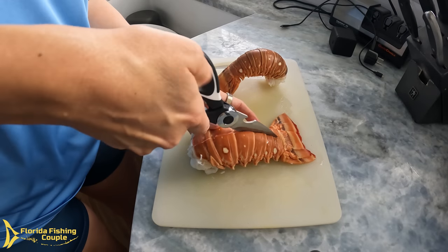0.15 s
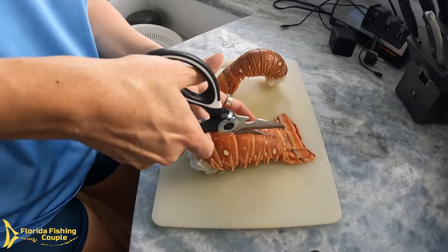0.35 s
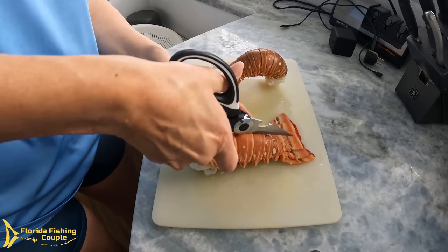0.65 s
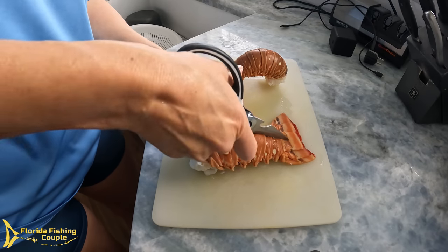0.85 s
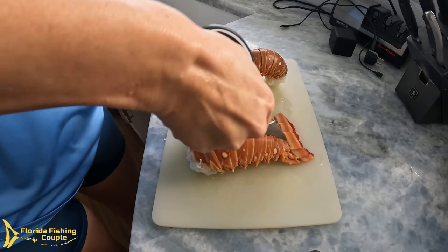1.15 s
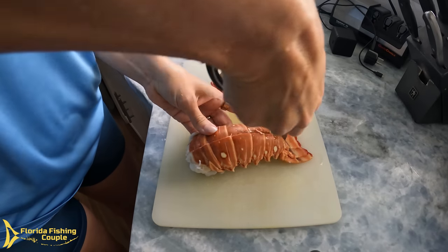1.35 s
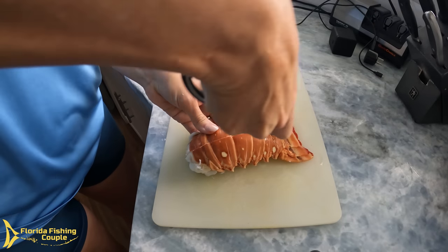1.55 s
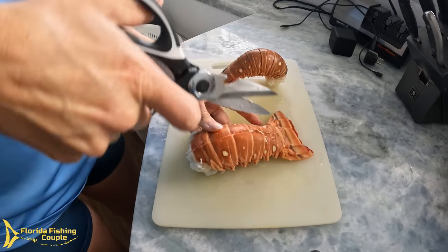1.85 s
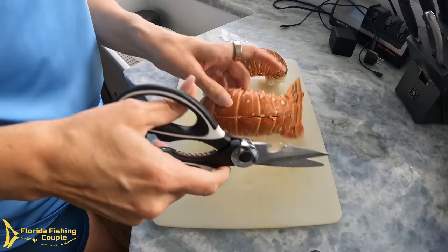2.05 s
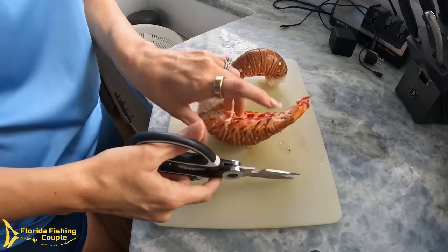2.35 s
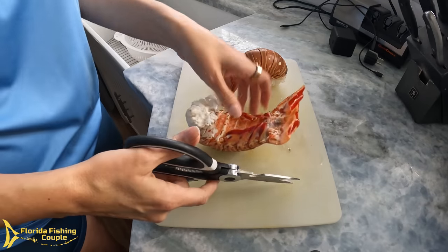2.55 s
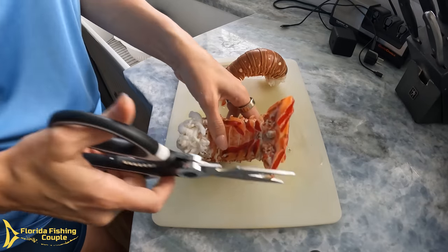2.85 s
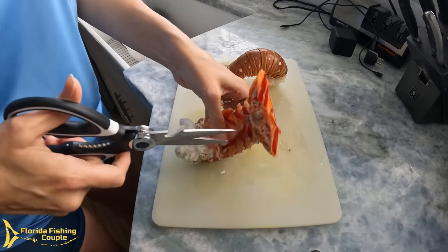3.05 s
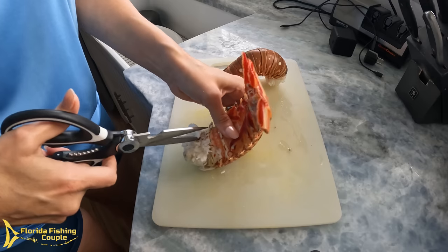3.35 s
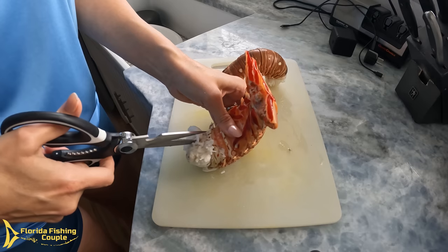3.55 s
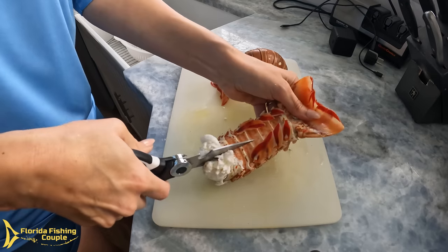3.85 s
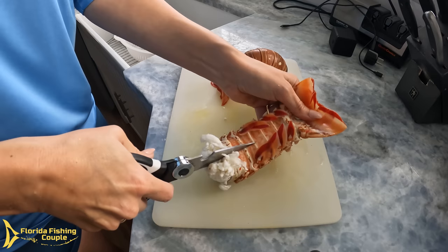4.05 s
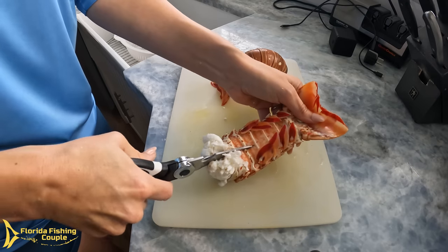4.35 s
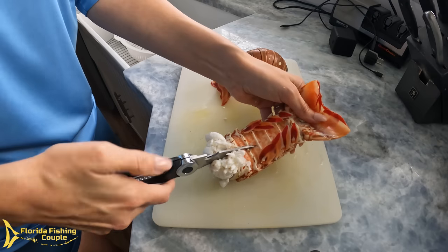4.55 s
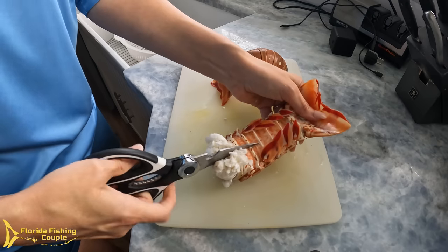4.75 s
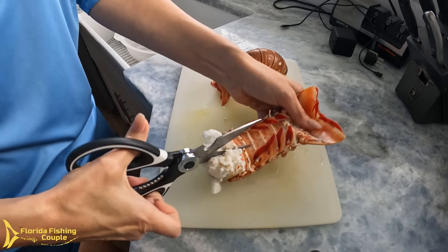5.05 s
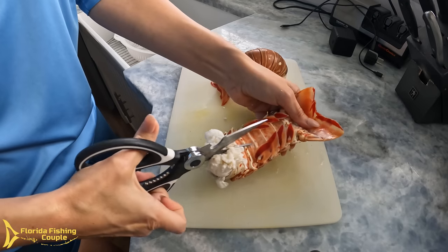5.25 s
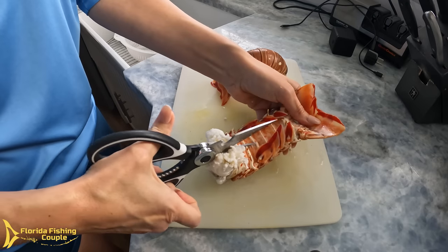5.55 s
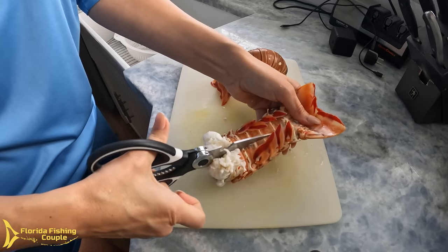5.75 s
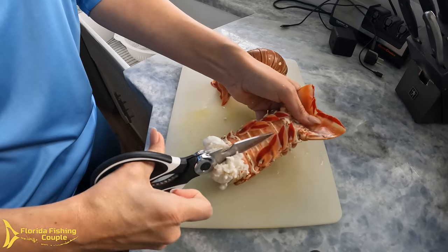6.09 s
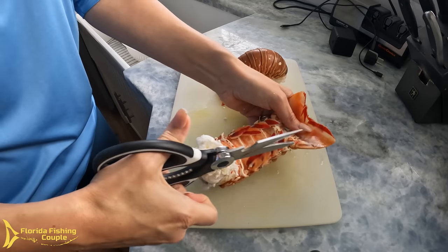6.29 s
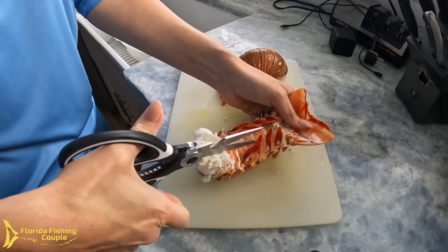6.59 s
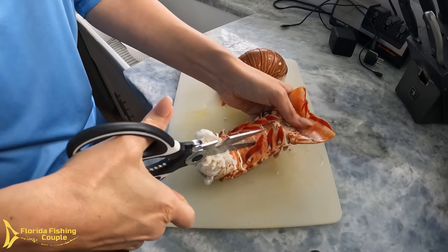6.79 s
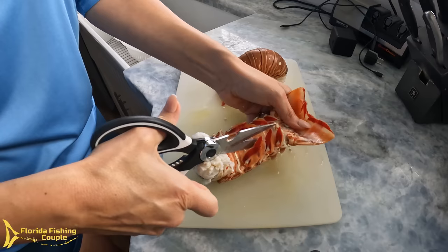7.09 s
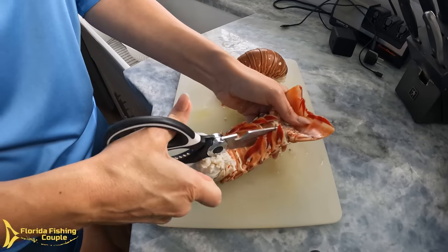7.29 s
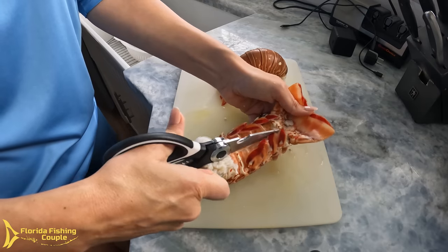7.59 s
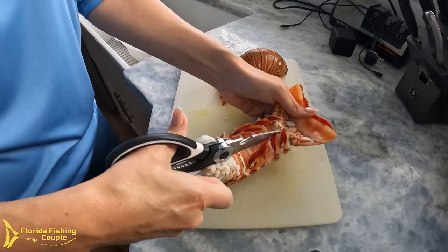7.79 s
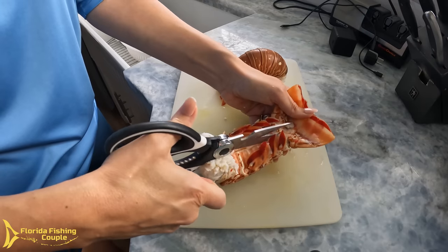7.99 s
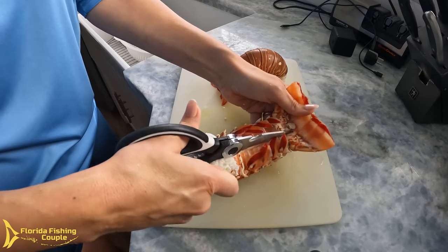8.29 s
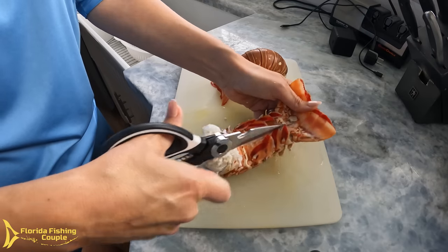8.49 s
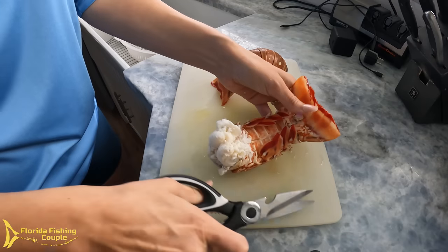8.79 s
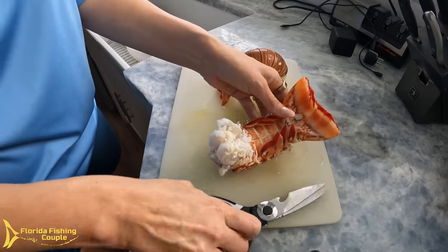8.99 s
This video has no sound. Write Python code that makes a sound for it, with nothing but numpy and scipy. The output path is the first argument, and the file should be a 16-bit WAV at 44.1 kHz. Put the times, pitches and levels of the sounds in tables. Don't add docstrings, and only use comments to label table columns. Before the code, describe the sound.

Sharp shell cracks and dry crunches come in uneven bursts on a cutting board in a bright hard-walled kitchen, low hum and faint distant engine behind.

```python
import sys
import numpy as np
from scipy import signal
from scipy.io import wavfile
from scipy.ndimage import uniform_filter1d

SR = 44100
rng = np.random.default_rng(int(sys.argv[2]) if len(sys.argv) > 2 else 0)


def bounce(signal):
    frames = np.transpose(np.atleast_2d(signal))
    limited = np.clip(frames, -1, 1)
    pcm = np.round(limited * 32767).astype(np.int16)
    wavfile.write(sys.argv[1], SR, pcm)


def invert_db(x):
    u = np.asarray(x, float) / 20
    return 10 ** u


N = 402633

RUB_WIDTH = 0.2


def cracks():
    # (frequency [Hz], level [dB], t60 [s])
    board_modes = [(256, -21.5, 0.0047), (416, 2.5, 0.033), (531, -12.5, 0.15), (693, 10.5, 0.054),
                   (800, 5.5, 0.041), (1162, 5, 0.046), (1804, -1, 0.074)]
    dry, feed, t = np.zeros(N), np.zeros(N), np.arange(3000) / SR
    rows = breaks()
    chance = rng.standard_normal((len(rows), 3, len(t)))
    snap = 1. * (t == 0)
    sharp = peak_one(resonate(snap, 3500, 8500))
    for (s, db, hz, knock_db, t60, wet_db), (grain, uneven, shift) in zip(rows, chance):
        shell = peak_one(resonate(resonate(snap, hz, 0.31 * hz), hz, 1.5 * hz))
        spray = grain * invert_db(2.62 * uneven - 60 * t / max(t60, .002))
        spray = spray * np.minimum(t / 0.00078, 1) * 39.7 * t60
        ring = signal.fftconvolve(snap + spray, shell)[:len(t)]
        fizz = signal.fftconvolve(snap + 5.9 * spray, sharp)[:len(t)]
        board = np.zeros(len(t))
        for k, (f, level_db, mode_t60) in enumerate(board_modes):
            reach = invert_db(level_db - 60 * t / mode_t60) / (1 + (f / (1.28 * hz)) ** 4)
            board += reach * np.sin(2 * np.pi * f * (1 + 0.023 * shift[k]) * t)
        knock = signal.fftconvolve(snap + 0.32 * spray, board)[:len(t)]
        fizz_share = np.clip(t60 / 0.008, 0.49, 1) * invert_db(0.16 * db) / (1 + (1600 / hz) ** 2)
        broken = peak_one(peak_one(ring) + fizz_share * peak_one(fizz))
        add(dry, s, invert_db(db) * (broken + invert_db(knock_db) * peak_one(knock)))
        add(feed, s, invert_db(db + wet_db) * 0.69 * shell)
        add(feed, s, invert_db(db + wet_db) * 1.37 * sharp)
        add(feed, s, invert_db(db + wet_db + knock_db) * 0.78 * peak_one(board))
    return dry, feed


def breaks():
    # (time [s], peak [dB], shell pitch [Hz], room share [dB])
    snaps = [(1.156, -11, 2500, -12), (1.179, -0.5, 3270, -18), (1.3155, -1.5, 4950, -33),
             (1.3295, 1, 3600, -16.5), (1.3682, 1.5, 3230, -15), (1.4335, -2.5, 3040, -17.5),
             (1.4451, -14, 3250, -24), (5.0812, -7, 2540, -21), (5.903, -6, 3700, -12),
             (5.9222, -15, 3623, -20), (7.3654, -14.5, 2870, -17), (7.3961, -6.5, 3550, -22),
             (7.4217, -12.5, 3500, -22), (7.9334, -7, 3660, -18.5), (8.3548, -5.5, 2240, -14),
             (8.522, -13.5, 3130, -16), (8.53, -19, 1870, -5)]
    # (time [s], peak [dB], shell pitch [Hz], room share [dB])
    splits = [(0.1102, -18, 2850, -8.5), (0.4782, -11, 2940, -14.5), (0.7842, -4, 3670, -11.5),
              (0.978, -14, 5500, -14), (1.2875, -20, 2020, -17), (1.3119, -5, 3560, -1),
              (1.3838, -15.5, 1840, -7), (1.75, -12, 3100, -11), (1.763, -16.5, 2740, -6),
              (2.3301, -25.5, 3640, 3.5), (4.0876, -7.5, 2920, -5), (4.0972, -1, 9280, -5.5),
              (4.3297, 1.5, 4400, -5.5), (5.0756, -5, 2460, -12.5), (5.087, -6, 3600, -6.5),
              (6.0472, 1.5, 4540, -4), (6.1268, -12, 3460, -3), (6.173, -9.5, 3530, -20.5),
              (7.6694, 2, 4300, -6.5), (7.9374, -18.5, 3700, -30), (8.3509, -4.5, 3870, -8),
              (8.8992, -10, 5750, -7.5)]
    # (time [s], peak [dB], shell pitch [Hz], board [dB], room share [dB])
    knocks = [(0.6529, -33, 564, 1, 2), (.772, -12.5, 2000, -9, -5), (.7736, -17.5, 700, -14, -7),
              (0.9213, -33.5, 800, 2.5, -12), (0.9771, -15, 1060, -24, -18), (2.33, -12, 1500, 6, -6.5),
              (2.338, -11.5, 2540, 0, -6), (2.45, -11.5, 1030, 1.5, -19), (2.638, -22, 830, 6.5, -17),
              (4.0976, -7.5, 1980, -4.5, -11.5), (4.106, -9.5, 1910, -5, -7.5),
              (4.3281, -8.5, 5030, -5.5, -25), (5.2438, -21.5, 2800, -6, -2), (6.23, -21.5, 680, 8, -14),
              (6.8673, -21, 1350, -6, -0.5), (7.67, -10.5, 730, -12, -25), (8.8905, -19.5, 540, 5, -19),
              (8.896, -7.5, 2080, -3.5, -6), (9.103, -13, 1090, -1, -10)]
    # (time [s], peak [dB], shell pitch [Hz], board [dB], splinter t60 [s])
    crushes = [(0.473, -22.5, 860, -15, 0.048), (.551, -16, 1940, -27, 0.1), (.7693, -23.5, 760, -7, 0.14),
               (1.7522, -11, 1820, -37, 0.093), (2.64, -21.5, 1380, 3, 0.11),
               (4.1088, -12.5, 979, -4, 0.064), (5.9401, -11.5, 3250, -14.5, 0.029),
               (6.0433, -8, 2720, -18, 0.038), (6.2846, -21, 633, -23, 0.075),
               (7.6622, -15, 2270, -15, 0.052), (8.89, -9.5, 1190, -23, 0.038)]
    # (time [s], peak [dB], shell pitch [Hz])
    back_ticks = [(0.0553, -29, 1960), (0.0752, -30, 2860), (0.0886, -25, 2700), (0.2312, -32, 2750),
                  (0.281, -37.5, 1830), (0.43, -30, 1470), (0.46, -28, 3430), (0.4674, -19, 2010),
                  (0.5416, -33, 4110), (0.6307, -25, 1790), (0.636, -21.5, 2340), (0.6534, -30, 4240),
                  (0.683, -31, 4350), (0.7226, -28.5, 1990), (1.1525, -27.5, 2340), (1.248, -17, 2060),
                  (1.6152, -19, 2170), (1.8204, -21.5, 4460), (1.9092, -33, 2800), (2.049, -42, 3920),
                  (2.164, -39, 3040), (2.9482, -39, 5160), (2.9835, -45, 2640), (3.265, -36, 1100),
                  (3.2974, -35, 820), (3.3178, -37, 820), (3.335, -34, 800)]
    # (time [s], peak [dB], shell pitch [Hz])
    belly_ticks = [(4.0133, -37.5, 4500), (4.078, -37, 3530), (4.2128, -23, 3950), (4.31, -24, 5500),
                   (4.803, -31.5, 4400), (5.173, -21, 2130), (5.3353, -21.5, 2900), (5.3423, -24, 940),
                   (5.3719, -21, 2750), (5.8653, -32.5, 3160), (5.885, -32, 3780), (5.914, -15.5, 3140),
                   (6.004, -29, 2370), (6.123, -15, 2600), (6.2823, -20.5, 4480), (6.985, -35, 2500),
                   (7.0386, -23.5, 1330), (7.4809, -20, 3860), (7.511, -25, 3800), (7.568, -29.5, 2980),
                   (7.5862, -29, 2980), (7.5986, -25, 3250), (7.623, -22, 5600), (7.6453, -15.5, 3880),
                   (7.658, -24, 3490)]
    # (time [s], peak [dB], shell pitch [Hz])
    fan_ticks = [(7.909, -30, 5620), (7.9236, -28, 4020), (7.9277, -25, 2220), (8.1707, -22, 2650),
                 (8.343, -22, 3530), (8.5457, -22, 3190), (8.5528, -23, 2670), (8.56, -33, 2110),
                 (8.5871, -21, 1960), (8.624, -35, 2840), (8.631, -25, 2630), (8.808, -45, 4040),
                 (8.8256, -32, 5600), (8.839, -34.5, 2860), (8.998, -23, 3000), (9.122, -25, 3870)]
    # (time [s], peak [dB], shell pitch [Hz])
    crisp_ticks = [(.242, -35, 4500), (0.274, -39, 3000), (.321, -30, 2500), (.738, -30, 4500),
                   (0.9783, -19, 2200), (1.124, -34, 5500), (1.264, -27, 4200), (1.338, -21, 800),
                   (1.678, -33, 3000), (1.72, -26, 5000), (2.4498, -29.5, 2980), (2.876, -43, 6000),
                   (2.916, -39, 6500), (2.931, -43, 6500), (3.021, -44, 4400), (3.382, -51, 4200),
                   (3.501, -52, 6000), (4.782, -38, 2500), (4.918, -37, 2800), (5.008, -35, 2000),
                   (5.963, -20.5, 2500), (6.957, -29.5, 6000), (7.347, -29, 4000), (7.604, -25, 6000),
                   (7.616, -34, 5500), (7.634, -30, 4500), (8.329, -28, 3500), (8.659, -38, 3500),
                   (8.674, -39, 2000), (8.3555, -12, 6500), (6.8682, -22.5, 4200), (7.6725, -9, 6500),
                   (7.939, -31, 6500), (.7, -39, 1800), (0.75, -28, 900)]
    tick_t60s = [0.0089, 0.0067, 0.0088, .003]
    rows = [(s, db, hz, -46, 0.001, wet) for s, db, hz, wet in snaps]
    rows += [(s, db, hz, -42, 0.011, wet) for s, db, hz, wet in splits]
    rows += [(s, db, hz, board, 0.015, wet) for s, db, hz, board, wet in knocks]
    rows += [(*row, -9) for row in crushes]
    for table, t60 in zip([back_ticks, belly_ticks, fan_ticks, crisp_ticks], tick_t60s):
        rows += [(*row, -12, t60, -6) for row in table]
    return rows


def shears():
    # (frequency [Hz], level [dB], t60 [s])
    shear_modes = [(590, 0, .32), (1140, -5, .22), (1730, -6, .2)]
    # (time [s], peak [dB])
    rattles = [
        (2.452, -22),
        (8.893, -19),
        (.72, -30),
    ]
    # (time [s], peak [dB], frequency [Hz])
    thumps = [
        (2.33, -23, 257),
        (4.108, -23, 230),
        (2.4512, -15.5, 1714),
        (2.4506, -17, 1156),
        (4.108, -17, 534),
        (4.333, -24.5, 170.4),
        (8.893, -25, 218),
    ]
    out, t = np.zeros(N), np.arange(SR // 2) / SR
    for (s, peak_db), noise in zip(rattles, rng.standard_normal((len(rattles), len(t)))):
        rattle = sum(invert_db(db - 60 * t / t60) * resonate(noise, hz, 60) for hz, db, t60 in shear_modes)
        add(out, s, invert_db(peak_db) * peak_one(rattle))
    for s, peak_db, hz in thumps:
        fall_db = 60 * t / 0.08 * np.sqrt(hz / 250)
        add(out, s, invert_db(peak_db - fall_db) * np.sin(2 * np.pi * hz * t))
    return out


def rustle():
    # (shell modes (frequency [Hz], width [Hz], level [dB]),
    #          stroke (time [s], level [dB], slip rate [1/s]))
    creaks = [
        ([(1230, 1100, 1), (2880, 1200, -1.5), (4200, 1299, -1), (5960, 1600, -1)], [(6.878, -33, 354), (6.889, -33.5, 550), (6.902, -30, 440), (6.912, -31.5, 550), (6.925, -33, 620), (6.945, -40, 500)]),
        ([(1910, 1200, -6), (3240, 700, -4.5), (4020, 900, 1), (5560, 1800, -7)], [(7.045, -33, 560), (7.09, -35, 650), (7.125, -27.5, 840), (7.14, -30, 970), (7.175, -27, 1030), (7.195, -29.5, 1400), (7.21, -36, 860), (7.228, -28.5, 730), (7.245, -32, 270)]),
    ]
    # (start [s], length [s], top [dB], pitch [Hz])
    swells = [(1.7, 0.093, -35.5, 2560), (2.075, 0.09, -43.5, 2840), (6.945, 0.058, -49, 3970),
              (7.02, 0.026, -30.5, 4300), (7.065, 0.031, -27.5, 2880), (8.1, 0.28, -53.5, 3530),
              (8.52, 0.069, -37.5, 3640), (9.045, 0.05, -43, 2500)]
    # (start [s], length [s], top [dB], pitch [Hz])
    builds = [
        (.68, 0.13, -52, 750),
        (.68, 0.11, -40.5, 1930),
        (7.55, 0.12, -41, 3600),
        (8.31, 0.068, -28.5, 3700),
    ]
    # (start [s], length [s], top [dB], pitch [Hz])
    afters = [(0, 0.14, -40.5, 3600), (.56, 0.14, -37, 2100), (1.19, 0.093, -37.5, 2480),
              (.98, 0.083, -55, 5600), (5.94, 0.045, -24, 2970), (8.61, 0.078, -37.5, 4030)]
    # (start [s], length [s], top [dB], pitch [Hz])
    blooms = [
        (4.34, 0.34, -38, 4400),
        (2.2, .12, -57, 850),
        (3.83, .09, -65, 6000),
    ]
    # (start [s], length [s], top [dB], first pitch [Hz], last pitch [Hz])
    narrow_bands = [
        (7.2, 0.036, -36, 1670, 1800),
        (4.34, 0.24, -39.5, 4450, 4440),
    ]
    out = np.zeros(N)
    add(out, *slips())
    for modes, rows in creaks:
        add(out, *creak(modes, rows))
    for table, top, ends_db in [(swells, 0.41, -13.5), (builds, 0.68, -32.5),
                                (afters, 0.058, -13.5), (blooms, 0.25, -16)]:
        for start, length, db, hz in table:
            add(out, *rub(start, length, db, hz, hz, top, ends_db, RUB_WIDTH))
    for row in narrow_bands:
        add(out, *rub(*row, 0.41, -4, 0.05))
    return out


def slips():
    # (time [s], peak [dB])
    slip_times = [(5.393, -27), (5.3976, -24.5), (5.4005, -30.5), (5.4033, -26), (5.4067, -22),
                  (5.4098, -22.5), (5.413, -26), (5.4169, -25), (5.421, -24.5), (5.4298, -23), (5.438, -23),
                  (5.4475, -24), (5.4577, -23), (5.4719, -23.5), (5.4805, -24.5), (5.4905, -23),
                  (5.4953, -25.5), (5.502, -22), (5.5061, -27), (5.5092, -27.5), (5.5124, -24.5),
                  (5.5155, -28), (5.5182, -25.5), (5.5237, -26.5), (5.5256, -22.5), (5.53, -28),
                  (5.5548, -30), (5.558, -29.5), (5.5626, -26.5), (5.563, -28.5), (5.5668, -32.5),
                  (5.569, -29.5), (5.5723, -27.5), (5.575, -23.5), (5.5824, -30.5), (5.5853, -26),
                  (5.5895, -26.5), (5.5938, -25), (5.599, -30), (5.606, -27), (5.614, -25.5),
                  (5.622, -28.5), (5.631, -32), (5.6391, -34), (5.6449, -34), (5.6555, -36.5),
                  (5.6668, -34.5), (5.7318, -34.5), (5.738, -37.5), (5.7432, -35), (5.7474, -35),
                  (5.7586, -29.5), (5.7695, -27.5), (5.776, -33), (5.7788, -30), (5.785, -26)]
    # (frequency [Hz], width [Hz], level [dB])
    slip_modes = [(1690, 400, -7), (2705, 600, 0), (3250, 510, -3), (5000, 700, -16)]
    s, db = np.transpose(slip_times)
    at = np.round((s - s.min()) * SR).astype(int)
    clicks = np.zeros(at.max() + 2000)
    clicks[at] = invert_db(db - 1)
    bend = 1 + 0.087 * rng.standard_normal(len(s))[np.cumsum(clicks > 0) - 1]
    return s.min(), ring_modes(clicks, slip_modes, bend)


def creak(modes, rows):
    s, *columns = np.transpose(rows)
    t = np.arange(s[0], s[-1], 1 / SR)
    level_db, rate = (np.interp(t, s, c) for c in columns)
    wobble, size = rng.standard_normal((2, SR // 2))[:, :len(t)]
    uneven_rate = rate * np.exp(0.06 * evened(uniform_filter1d(wobble, size=60)))
    turns = np.cumsum(uneven_rate) / SR
    clicks = -np.diff(np.floor(turns), prepend=0) * invert_db(1.8 * size)
    body = evened(ring_modes(clicks, modes)) + 0.1 * evened(clicks)
    power = uniform_filter1d(body ** 2, size=800) + 1e-9
    return s[0], invert_db(level_db) * body / np.sqrt(power) * signal.windows.tukey(len(t), .08)


def rub(start, length, top_db, first_hz, last_hz, top, ends_db, share):
    u = np.arange(0, length, 1 / SR) / length
    level_db = top_db + np.interp(u, [0, top, 1], [ends_db, 0, ends_db])
    hz = first_hz + (last_hz - first_hz) * u
    when, sign, size = rng.random((3, SR // 2))[:, :len(u)]
    ticks = (when < 2500 / SR) * np.sign(sign - .5) * invert_db(-3.0 * np.log(size + 0.016))
    width = share * hz.mean()
    body = resonate(resonate(ticks, hz, width), hz, 2 * width)
    body = body + 0.47 * share / RUB_WIDTH * resonate(ticks, 1900, 4600)
    fade = np.clip(np.minimum(20 * u, (1 - u) / (1.02 - top) * 2), 0, 1)
    return start, invert_db(level_db) * evened(body) * fade


def ring_modes(clicks, modes, bend=1):
    out = np.zeros(len(clicks))
    for hz, width, db in modes:
        ring = resonate(resonate(clicks, hz * bend, width), hz * bend, 2.97 * width)
        out += invert_db(db) * ring * SR / width / 6
    return out


def counter(x):
    t = np.arange(1200) / SR
    sparse = rng.standard_normal(len(t)) * (rng.random(len(t)) < .08)
    taps = sparse * invert_db(-60 * t / 0.11) * (t > .0008)
    return x + invert_db(-8.5) * signal.oaconvolve(x, taps / np.linalg.norm(taps))[:N]


def room(x):
    # (frequency [Hz], t60 [s])
    room_decay = [(200, 0.82), (700, 0.69), (2000, 0.59), (5000, 0.48), (12000, 0.49)]
    out, t = np.zeros(N), np.arange(N) / SR
    for k in range(3):
        taps = np.zeros(SR)
        at = np.arange(120, SR - 20, 20)
        taps[at + rng.integers(0, 20, len(at))] = rng.choice([-1., 1.], len(at))
        hz, s, z = signal.stft(taps, SR, nperseg=256)
        swell = np.clip(0.8 + s / 0.077, 0, 1.5)
        decay = invert_db(-60 * s / read(room_decay, hz)[:, None])
        tail = signal.istft(z * swell * decay, SR, nperseg=256)[1]
        turn = np.sqrt(2 / 3) * np.cos(2 * np.pi * (3 * t + k / 3))
        out += signal.fftconvolve(x * turn, tail / np.linalg.norm(tail))[:N]
    return out


def background():
    # (time [s], level [dB])
    slow_gain = [(0, -54.5), (.4, -54.5), (.8, -52), (2.0, -50), (4.05, -50.5), (4.4, -55), (5.1, -52),
                 (9.13, -51)]
    s, slow_db = np.transpose(slow_gain)
    gain = invert_db(np.interp(np.arange(N) / SR, s, slow_db) + 48)
    return (air() + fridge() + hums() + engine()) * gain


def air():
    # (frequency [Hz], level per Hz [dB])
    floor = [(15, -48.5), (25, -49), (92, -5), (200, -18.5), (263, -1), (309, -9), (405, -13), (695, -12),
             (863, -16), (1190, -18.5), (5430, -42.5), (7310, -47), (9070, -61.5), (11000, -50.5),
             (16000, -91)]
    frames, hz = N // 512 + 5, np.fft.rfftfreq(2048, 1 / SR)
    a, b, patches = rng.standard_normal((frames, len(hz), 3)).T
    patches = evened(uniform_filter1d(uniform_filter1d(patches, size=10, axis=0), size=6, axis=1))
    z = (a + 1j * b) * invert_db(read(floor, hz)[:, None] + 0.23 * patches)
    return invert_db(-43) * evened(signal.istft(z, nperseg=2048, noverlap=1536)[1][:N])


def fridge():
    # (multiple of the shaft [1], level [dB])
    orders = [(2, -68), (4, -55.5), (5, -54.5), (6, -39), (7, -58.5), (8, -54), (13, -57.5), (14, -55),
              (16, -53)]
    shaft_hz, t, out = 43.61, np.arange(N) / SR, np.zeros(N)
    for (k, db), start in zip(orders, rng.random(len(orders))):
        out += np.sqrt(2) * invert_db(db) * np.sin(2 * np.pi * (k * shaft_hz * t + start))
    return out


def hums():
    # (frequency [Hz], width [Hz], level [dB])
    hum_bands = [(58.5, 2, -53.5), (110, 56, -52.5)]
    out = np.zeros(N)
    for hz, width, db in hum_bands:
        noise = rng.standard_normal(N)
        out += invert_db(db) * evened(resonate(resonate(noise, hz, width), hz, width))
    return out


def engine():
    # (time [s], firing rate [Hz], level of its second multiple [dB])
    revs = [(.6, 110, -58), (0.849, 117, -51), (1.204, 128, -31.5), (1.35, 131, -57), (1.75, 142.5, -45.5),
            (2.0, 151.6, -38.5), (2.149, 150.8, -48.5), (2.7, 163.4, -45.5)]
    t = np.arange(N) / SR
    s, firing_hz, second_db = np.transpose(revs)
    turn = 2 * np.pi * np.cumsum(np.interp(t, s, firing_hz)) / SR
    second = invert_db(np.interp(t, s, second_db, -120, -120))
    steady = invert_db(-51.0) * np.interp(t, [.6, .9, 2.3, 2.7], [0, 1, 1, 0])
    return np.sqrt(2) * (steady * (np.sin(turn) + 0.306 * np.sin(3 * turn)) + second * np.sin(2 * turn))


def evened(x):
    return x / np.sqrt(np.mean(x ** 2) + 1e-20)


def peak_one(x):
    return x / (abs(x).max() + 1e-12)


def read(points, hz):
    f, value = np.transpose(points)
    return np.interp(np.log(hz + 1), np.log(f + 1), value)


def add(mix, s, sound):
    part = mix[max(round(s * SR), 0):][:len(sound)]
    part += sound[:len(part)]


def resonate(x, hz, width):
    turn = np.exp(2j * np.pi * np.cumsum(hz * np.ones(len(x))) / SR)
    r = np.exp(-np.pi * abs(width) / SR)
    return 2 * (turn * signal.lfilter([1 - r], [1, -r], x / turn)).real


def coloured(x, points):
    hz = abs(np.fft.fftfreq(4096, 1 / SR))
    log_gain = np.log(invert_db(read(points, hz)))
    taps = np.fft.ifft(np.exp(np.conj(signal.hilbert(log_gain)))).real[:2048]
    return signal.oaconvolve(x, taps)[:len(x)]


def ducked(x):
    power_db = 10 * np.log10(signal.lfilter([.004], [1, -.996], x ** 2) + 1e-12)
    fall = np.arange(N) * 56 / SR
    held_db = np.maximum.accumulate(power_db + fall) - fall
    over_db = np.maximum(held_db + 21, 0)
    return x / invert_db(0.26 * signal.lfilter([.003], [1, -.997], over_db))


def scene():
    # (frequency [Hz], gain [dB])
    mic_colour = [(60, -49), (200, 1), (5000, 2), (7000, -1.5), (8600, -16.5), (9150, -26.5), (9700, -13),
                  (10700, -6), (13000, -19), (14300, -43), (17000, -49)]
    dry, feed = cracks()
    friction = rustle() + shears()
    near = counter(dry + friction) + room(feed + invert_db(-14.5) * friction)
    return np.tile(coloured(near, mic_colour) + background(), (2, 1))


def roll_off(x):
    return signal.sosfilt(signal.butter(12, 16450, fs=SR, output="sos"), x)


def record(dry):
    # (frequency [Hz], side relative to mid [dB])
    port_width = [(1000, -49.5), (4000, -41.5), (6000, -27.5), (9000, -22), (12000, -10.5)]
    mid = ducked(dry.mean(0))
    scatter = rng.standard_normal(300) * np.hanning(300)
    side = coloured(signal.oaconvolve(mid, scatter / np.linalg.norm(scatter), "same"), port_width)
    hiss_colour = [(1500, -74), (6000, -24.5), (11000, -22.5), (16000, -18.5)]  # (frequency [Hz], level [dB])
    side = side + invert_db(-63) * coloured(rng.standard_normal(N), hiss_colour)
    ports = np.array([mid + side, mid - side])
    ports = 1.06 * ports / (1 + abs(ports) ** 4) ** .25
    return roll_off(np.clip(ports, -1, 1))


dry = scene()
out = record(dry)
bounce(out)
```